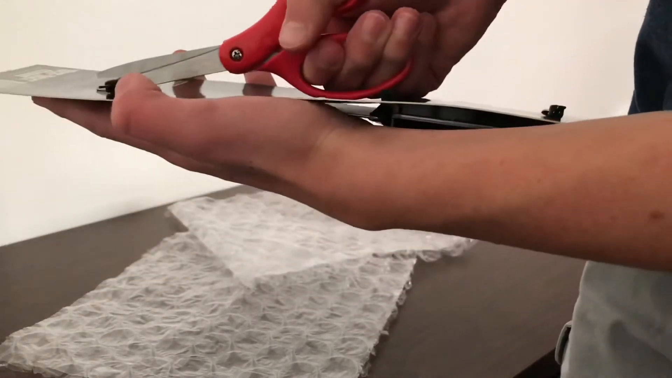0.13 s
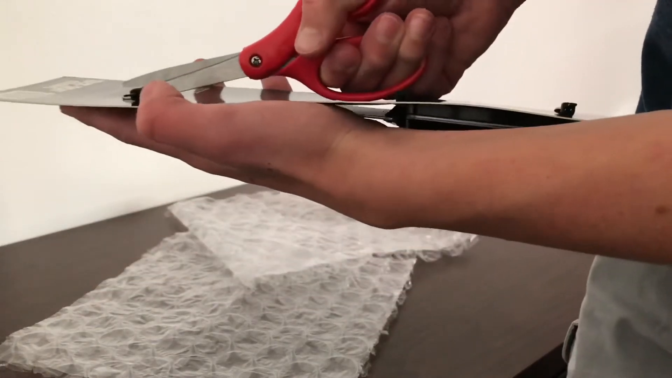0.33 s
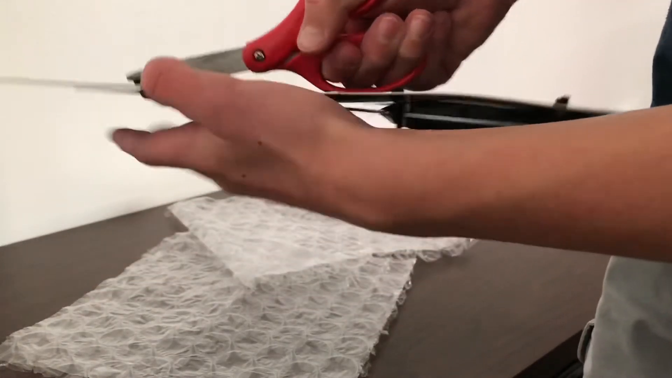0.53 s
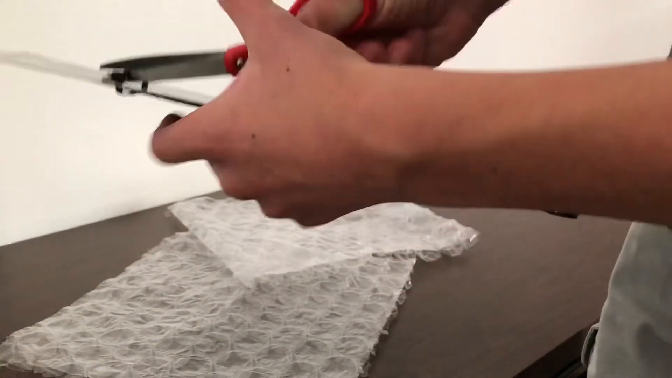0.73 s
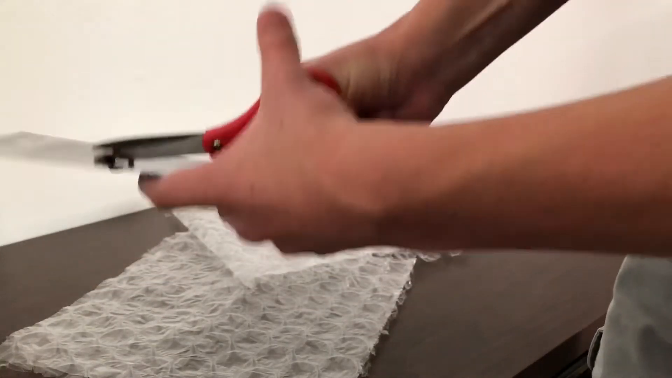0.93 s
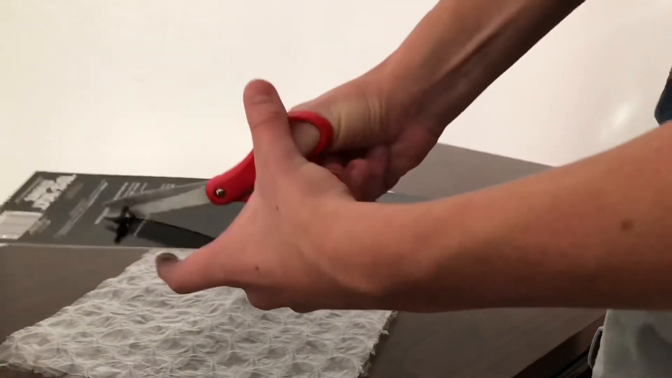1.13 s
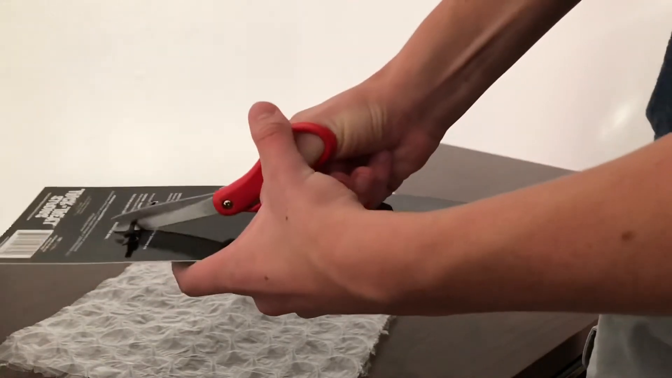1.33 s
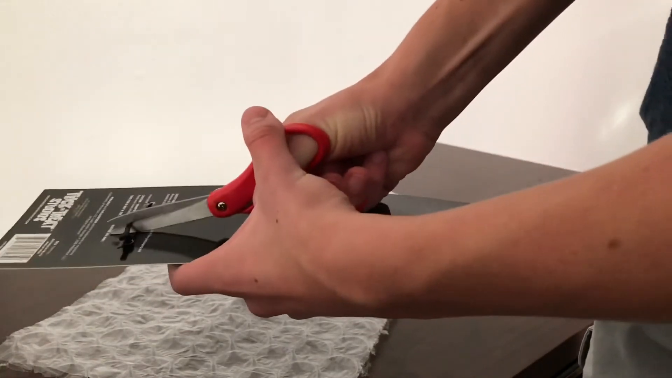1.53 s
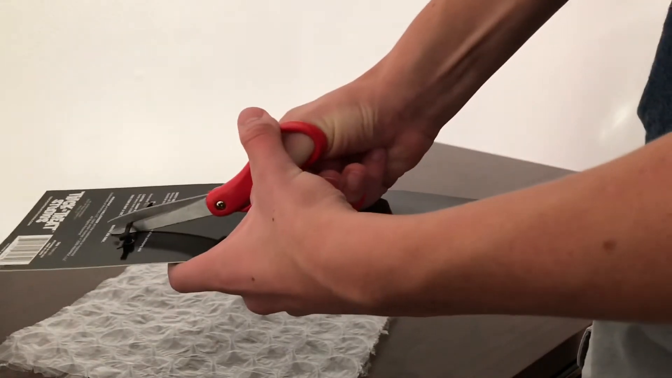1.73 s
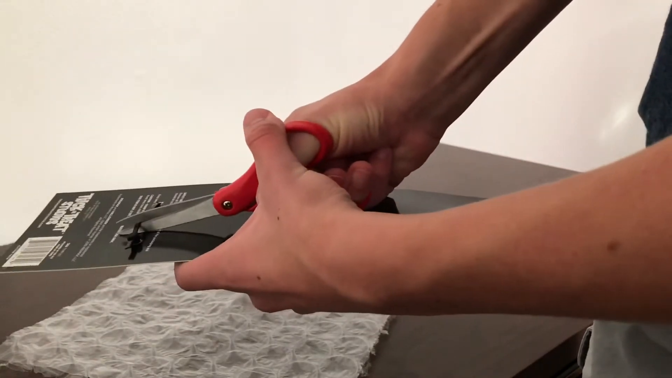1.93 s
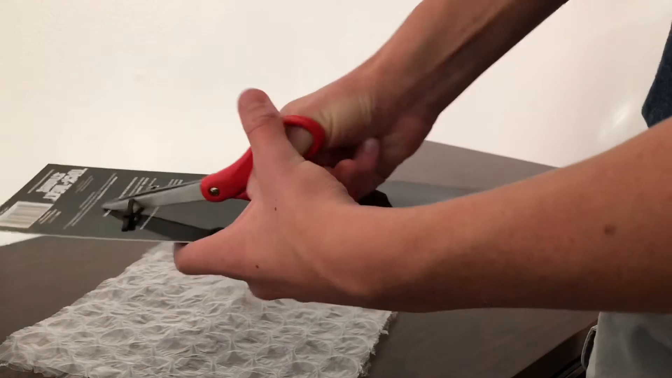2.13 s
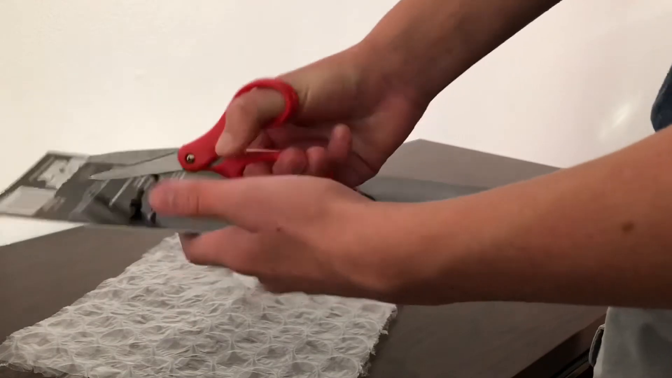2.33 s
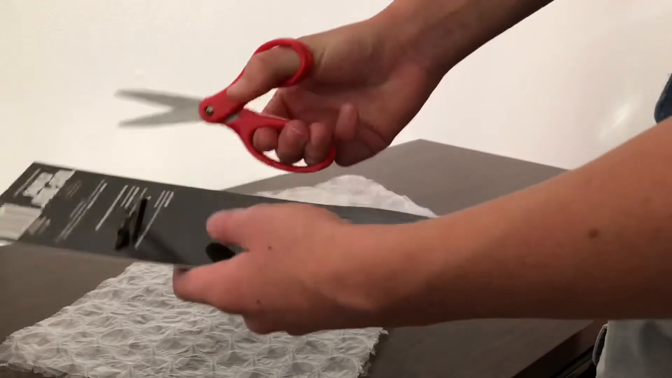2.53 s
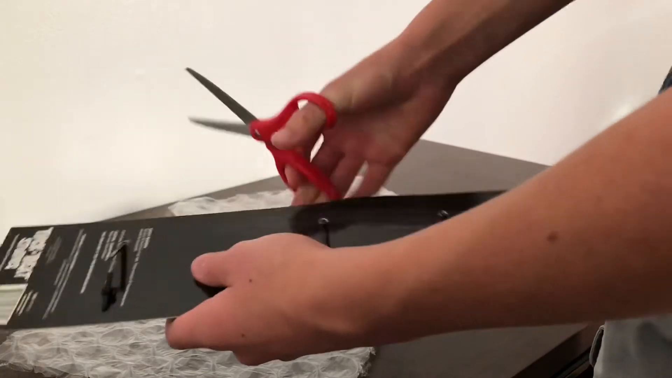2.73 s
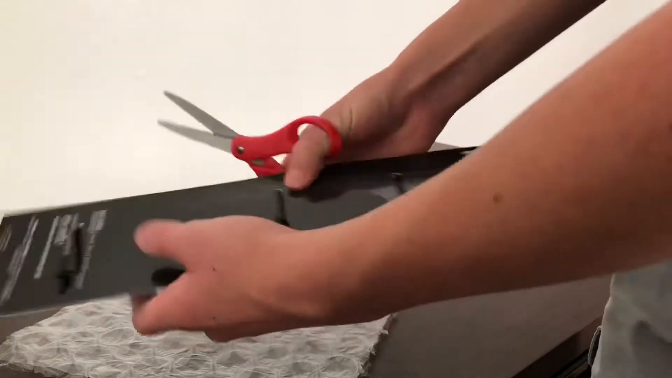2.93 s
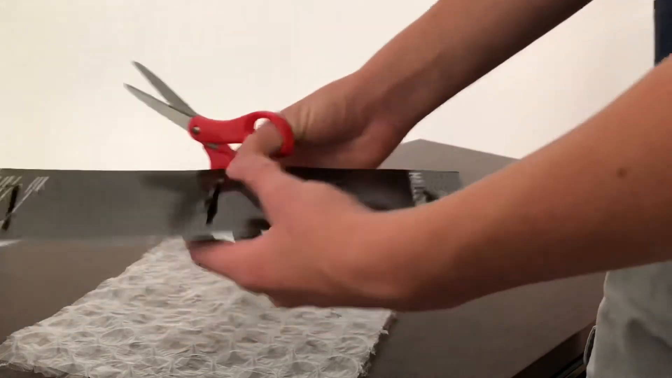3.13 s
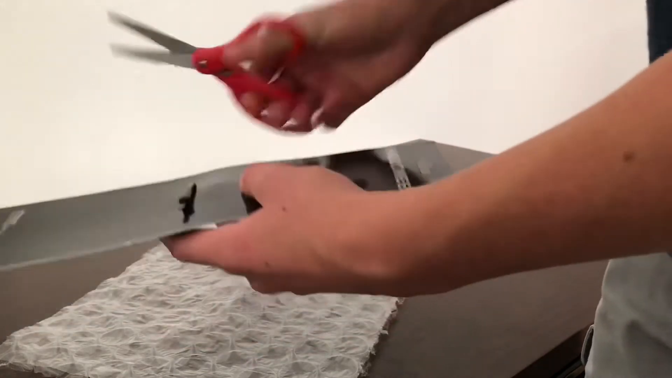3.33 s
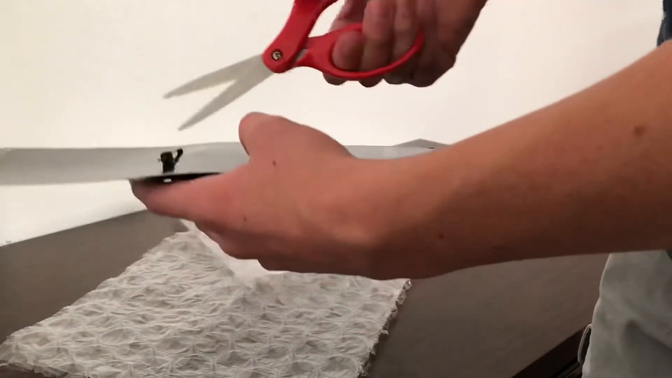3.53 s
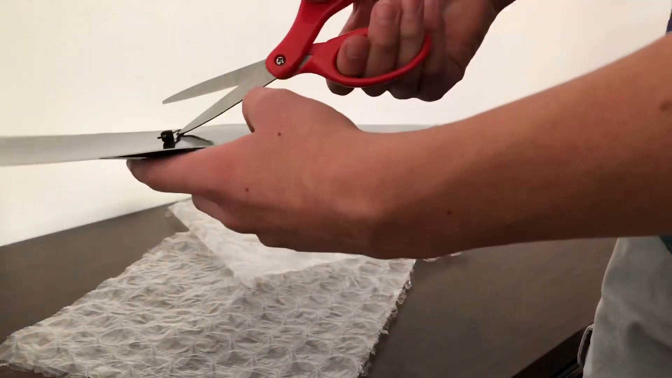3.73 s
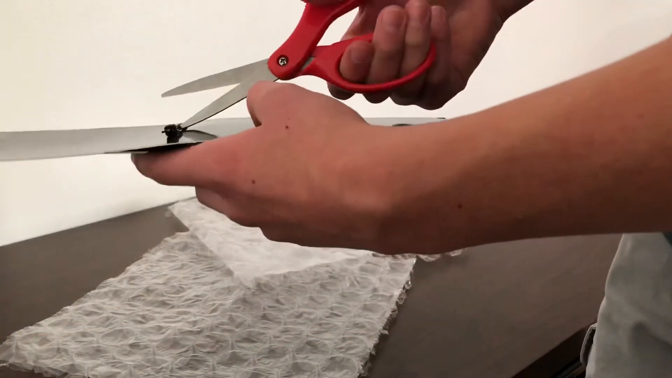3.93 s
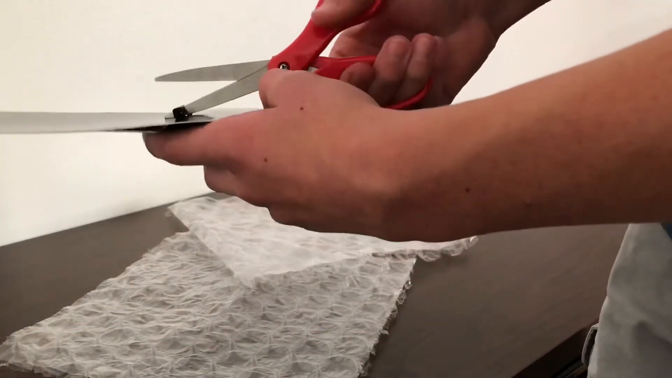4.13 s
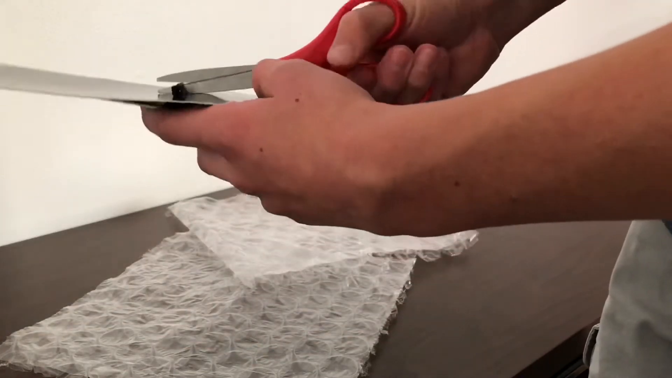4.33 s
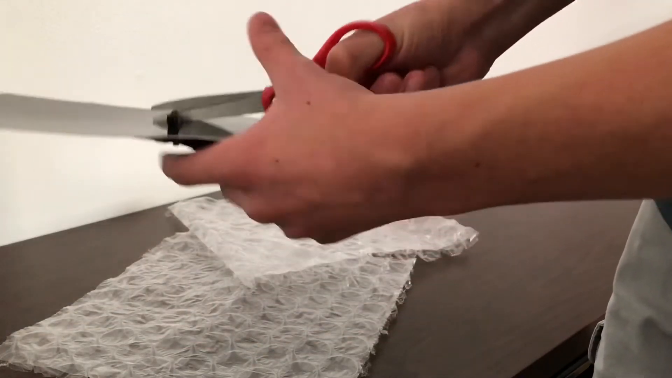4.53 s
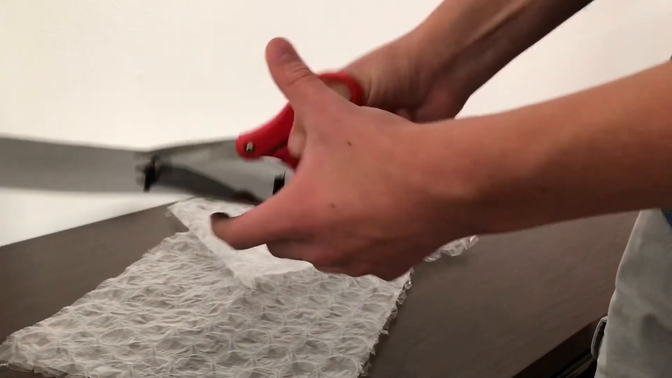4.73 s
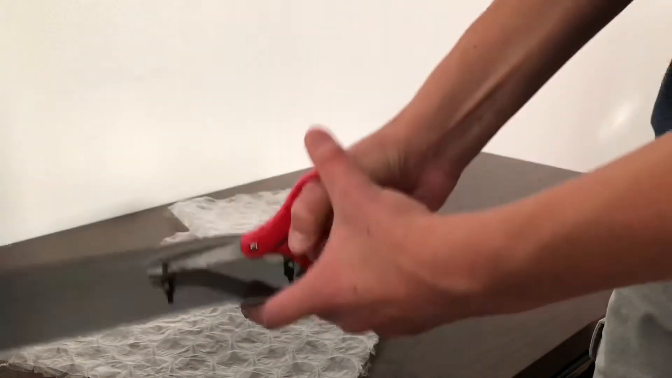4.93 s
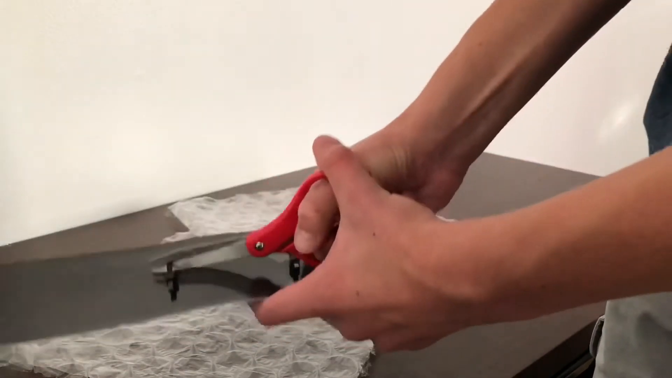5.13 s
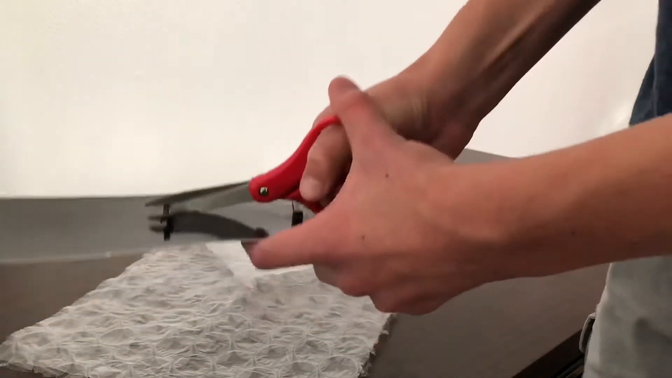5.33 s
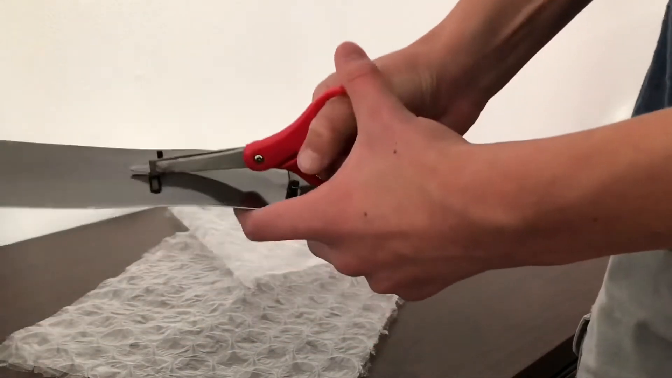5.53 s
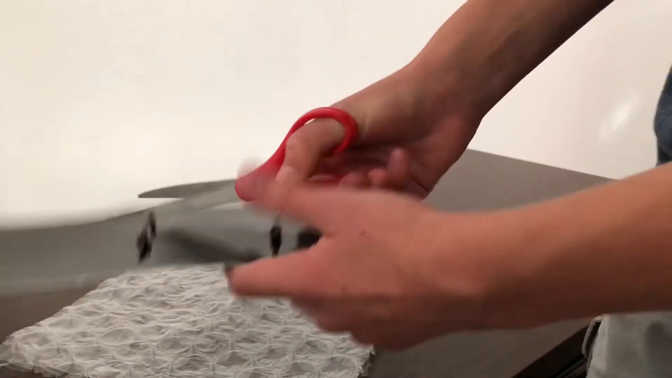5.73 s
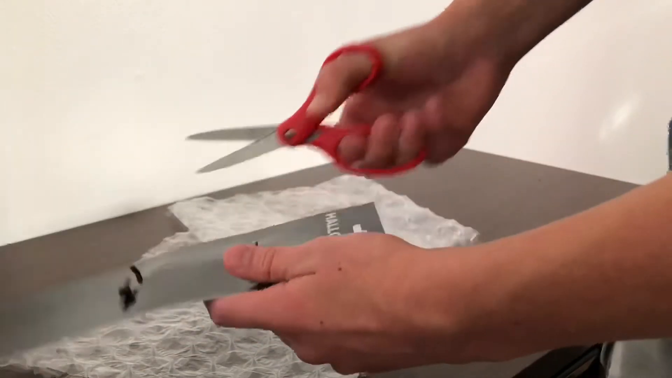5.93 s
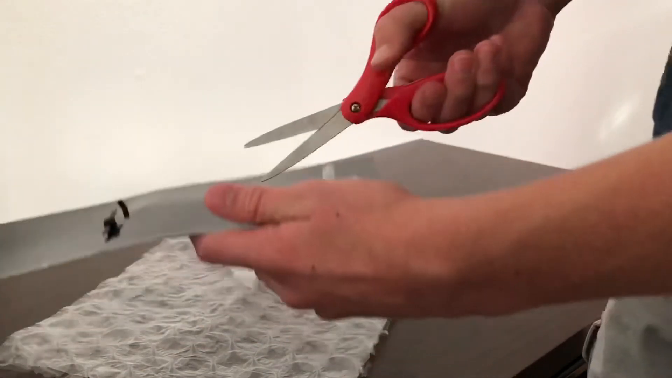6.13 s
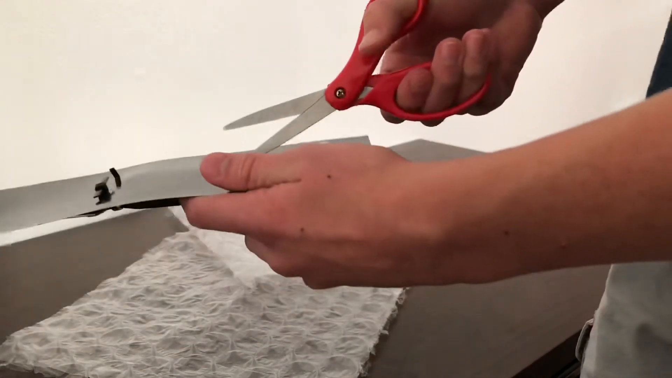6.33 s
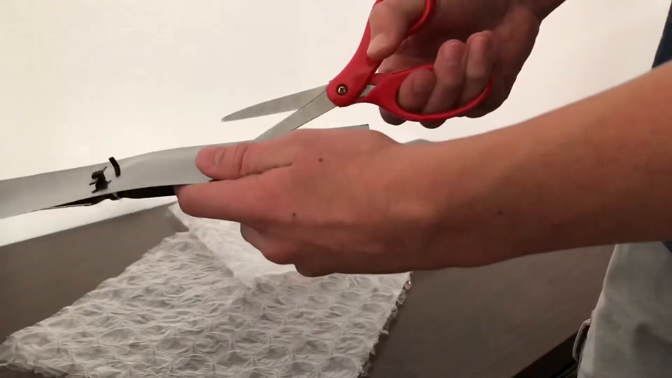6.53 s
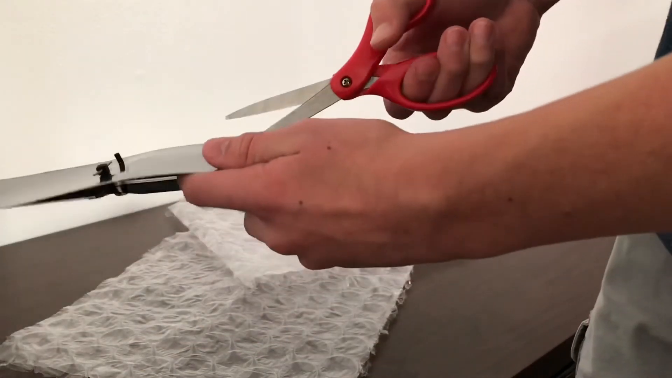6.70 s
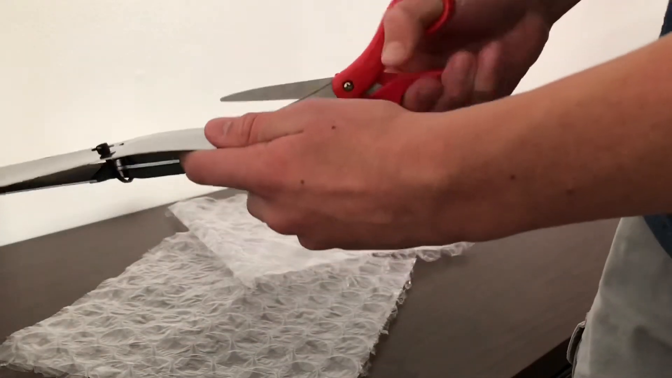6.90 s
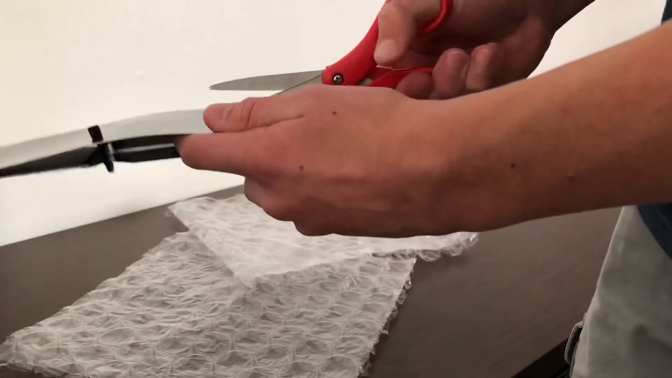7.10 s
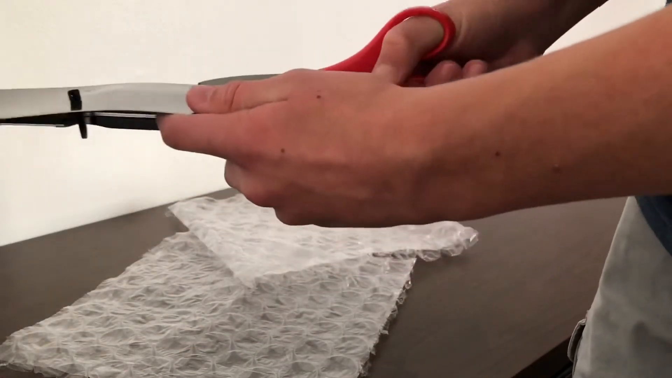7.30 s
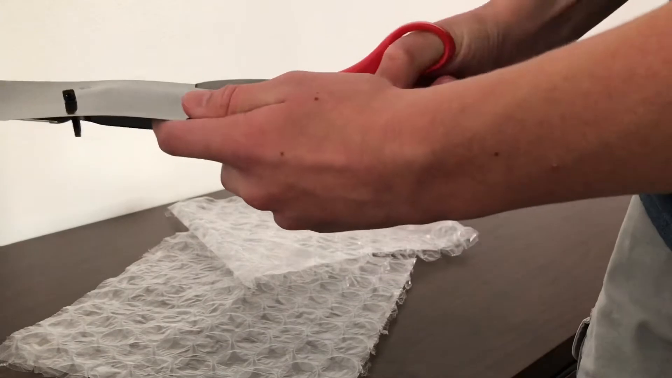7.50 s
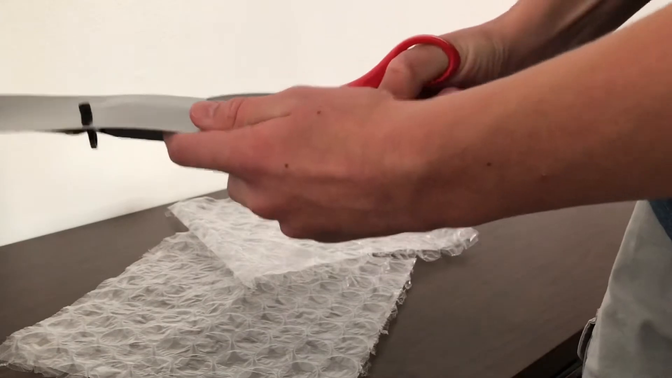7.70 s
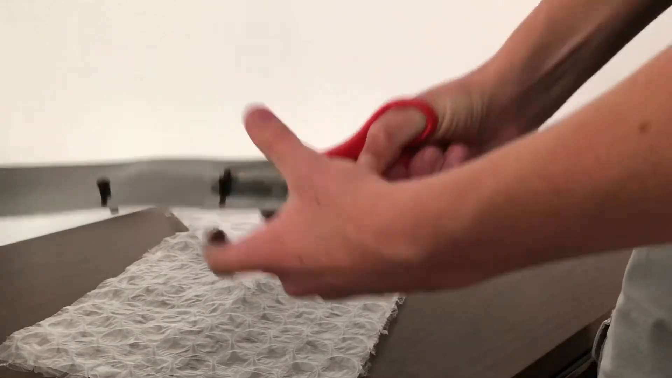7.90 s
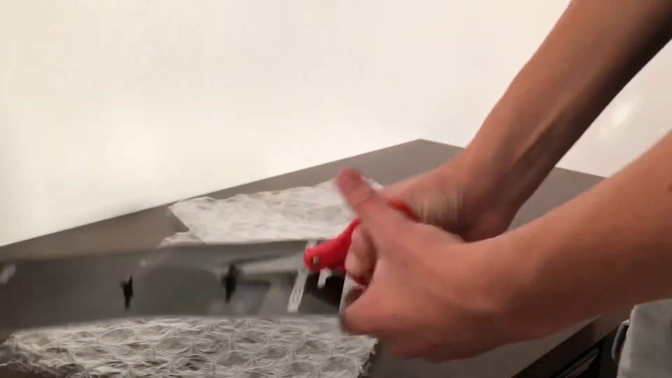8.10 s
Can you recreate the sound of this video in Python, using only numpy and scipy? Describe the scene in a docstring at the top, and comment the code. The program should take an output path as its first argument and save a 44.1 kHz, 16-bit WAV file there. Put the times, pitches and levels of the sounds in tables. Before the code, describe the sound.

Close, dry clicks and crackly handling of stiff packaging, broken by two hard cracks as scissors cut plastic ties.

```python
"""Scissors work at the plastic ties on a stiff card, close to a camera in a small quiet room.
From the start, filtered noise gives faint hiss and rumble, and fingers rub the card (rough, crackly noise).
Before half a second blades begin to scuff and tick; soft thumps, decaying sine waves, soon join in.
Ties snap near 1.9 s and 5.3 s: noise bursts, with a blow that rings the card and the room.
Small contacts go on between and after the snaps; at the end only rubbing and the faint background are left."""
import sys
import numpy as np
from scipy import signal
from scipy.fft import rfft, irfft, next_fast_len
from scipy.io import wavfile

SR = 44100
rng = np.random.default_rng(int(sys.argv[2]) if len(sys.argv) > 2 else 0)


def put_to_file(sound):
    """Save the sound as 16-bit audio at rate SR, in the file named by the first command-line argument."""
    columns = np.atleast_2d(sound).T  # one column per channel
    safe = np.clip(columns, -1, 1)
    whole_steps = np.round(safe * 32767)
    wavfile.write(sys.argv[1], SR, whole_steps.astype(np.int16))


N = 364266

# colour of the room and microphone noise, only its shape counts: (f/Hz, level/dB)
AIR_COLOUR = [(15, -36), (28, -17), (45, -6), (119, -8), (171, -15), (306, -15.5), (400, -20.5),
              (857, -23.5), (1920, -29.5), (15500, -36.5)]
AIR_DB = -64.5  # level of that noise before the final colouring
# fingers on the card: (t/s, rustle level/dB, hiss level/dB)
RUBS = [(.2, -78, -80), (.4, -69, -79), (.92, -59, -65), (1.25, -83.5, -90), (1.93, -85, -89.5),
        (2.03, -52.5, -57), (2.2, -54, -63), (2.55, -81, -94), (2.999, -64.5, -60.5), (3.45, -81.5, -83.5),
        (3.87, -72, -79.5), (4.5, -72, -77), (5.3, -73, -70), (5.599, -65.5, -71.5), (5.9, -75.5, -77),
        (6.6, -81, -86), (6.971, -67, -81.5), (7.5, -78.5, -89), (7.92, -75.5, -70), (8.26, -78, -81)]
# colour of skin rubbing: (f/Hz, level/dB)
SKIN_COLOUR = [(88, -71.5), (150, -9.5), (555, 4), (821, -1.5), (1140, 1), (1260, -7.5), (1600, -5.5),
               (2450, -7), (16000, -35)]

# short slides of blade or tie over the card:
# (t/s, length/s, level/dB over that length, favoured f/Hz, treble level/dB)
SCUFFS = [(0.398, 0.026, -59.5, 870, -9), (0.578, 0.032, -52, 766, -14.5), (0.877, 0.03, -46, 880, -25),
          (1.875, 0.029, -61.5, 3200, -6), (2.056, .045, -54, 1236, -20.5),
          (2.123, 0.027, -52.5, 1300, -3.5), (2.235, 0.029, -48, 2580, -1),
          (2.336, 0.029, -60, 2500, -21.5), (2.37, 0.017, -33.5, 1265, -24.5),
          (2.616, 0.092, -61.5, 5100, 3), (2.872, 0.04, -39, 1098, -15.5), (3.01, 0.042, -56.5, 1980, 0),
          (3.068, 0.025, -47, 646, -8), (3.185, 0.055, -58.5, 1910, -20.5),
          (3.725, 0.035, -59.5, 1780, -19), (3.872, 0.1, -62, 2515, -16), (3.967, 0.06, -57, 1757, -20),
          (4.201, 0.055, -53.5, 691, -25.5), (4.638, 0.094, -57.5, 848, -24),
          (4.876, 0.029, -39.5, 629, -9), (5.653, 0.031, -44, 1106, -7.5), (5.676, 0.02, -38.5, 2599, -3.5),
          (5.712, 0.044, -49, 1067, -15), (6.532, 0.035, -58, 2050, 0.5), (6.733, 0.096, -64, 1094, -12),
          (6.848, 0.047, -64.5, 1060, -9), (6.964, 0.0492, -56.5, 1110, -14), (7.059, .07, -66, 1140, -20),
          (7.112, 0.059, -59, 647, -11.5)]
# sharp contacts of blade, tie and card:
# (t/s, level/dB over the first 10 ms, favoured f/Hz, treble level/dB)
CLICKS = [(0.427, -48, 820, -7.5), (0.508, -50, 810, -8), (0.6825, -57.5, 810, -28),
          (0.776, -53.5, 4370, -12), (0.7846, -38.5, 990, -13.5), (0.8746, -39, 2900, -0.5),
          (0.9246, -51.5, 3200, -26), (0.9423, -51, 870, -33), (1.0203, -43.5, 1120, -12.5),
          (1.1223, -47, 650, -14), (1.3388, -64.5, 4360, -7), (1.9013, -17.5, 2350, 0),
          (1.902, -13.5, 666, -10), (1.9024, -22, 3800, -11), (2.073, -50, 2470, -34),
          (2.104, -54, 979, -31), (2.1205, -40.5, 1420, -33.5), (2.129, -45.5, 1520, -25),
          (2.2105, -48, 980, -22), (2.2491, -40, 910, -21), (2.3664, -32, 5900, -1),
          (2.3714, -25.5, 2820, 1), (2.3805, -34, 4370, -6.5), (2.385, -36.5, 1370, -19),
          (2.4116, -42, 1420, -8), (2.702, -53.5, 3570, 9), (2.815, -61, 1330, -8),
          (2.8287, -49.5, 490, -27), (2.848, -55, 2340, -9), (2.8623, -39, 1960, -3),
          (2.8831, -40, 1220, -3), (2.9549, -49, 1310, -17.5), (3.0989, -46.5, 2480, -21),
          (3.1047, -38, 2560, -9), (3.119, -47, 3200, -32), (3.183, -43, 1350, -12),
          (3.192, -49, 1640, -23), (3.2239, -62, 1102, -12.5), (3.2443, -53.5, 2714, -10),
          (3.6247, -46.5, 1810, -10), (4.2236, -55, 752, -4), (4.3156, -61, 1900, -37.5),
          (4.35, -65, 2006, -22.5), (4.4342, -62, 2393, -3.5), (4.7403, -45.5, 1060, -25),
          (4.799, -54.5, 800, -14), (4.8736, -34.5, 2630, -21), (5.317, -55.5, 3200, -8),
          (5.3385, -13.5, 3200, 2.5), (5.3398, -15, 1014, -12), (5.348, -27, 3080, -5.5),
          (5.579, -39.5, 885, -1.5), (5.599, -34, 1100, -5), (5.748, -49.5, 6170, 8.5),
          (5.7609, -45.5, 936, -13), (6.1142, -46.5, 1820, -16.5), (6.2153, -53, 2070, -16),
          (6.78, -62, 980, -19.5), (6.957, -44, 3120, -6.5), (6.962, -49.5, 1110, -3),
          (6.9645, -38.5, 2490, 5), (7.031, -58.5, 3000, -14), (7.043, -56.5, 675, -34),
          (7.054, -57, 1090, -30), (7.141, -55.5, 1990, -32), (7.1503, -48.5, 610, -41),
          (7.379, -67, 2380, -12), (7.7053, -56.5, 1174, -3), (7.7475, -57.5, 609, -5)]
# the card flexes or is knocked: (t/s, starting level/dB before the soft onset, f/Hz)
THUMPS = [(.59, -49, 100.5), (0.788, -42, 280), (.791, -32.5, 1230), (1.021, -38, 280), (1.902, -25, 126),
          (1.902, -21, 181), (1.902, -13.5, 275.1), (1.904, -15.5, 420), (1.905, -7, 840),
          (2.119, -35, 436), (2.371, -17, 1293), (2.829, -44, 112), (2.879, -45, 91), (3.099, -45, 98),
          (3.104, -32, 1256), (3.111, -39.5, 650), (3.626, -41.5, 280), (4.882, -43, 118),
          (5.339, -35.5, 128), (5.34, -19.5, 280), (5.343, -23, 417.3), (5.347, -22, 840), (5.58, -36, 280),
          (7.148, -43, 300)]

# ways the card rings: (f/Hz, width/Hz, level/dB before random scatter and the ring level)
CARD_MODES = [(280, 37, -2), (420, 19, 4), (697, 14, 1.5), (840, 36, 1), (1050, 96, -8), (1320, 160, -5.5),
              (1397, 20, -3), (1980, 12, -12.5), (2180, 150, -9), (2470, 66, -6), (3200, 180, -4),
              (3620, 180, -2.5), (5900, 220, -17.5)]
# colour of breaking plastic, shared by clicks and scuffs: (f/Hz, level/dB)
CRACK_COLOUR = [(40, -40.5), (100, -10.5), (200, -2), (500, -2.5), (1200, -3), (1700, -9.5), (2300, -8.5),
                (3300, -11.5), (4600, -10.5), (5700, -9.5), (8660, -12), (14600, -13), (16000, -16.5)]
# how long an echo of size 1 takes to fall 60 dB: (f/Hz, time/s)
ECHO_TIMES = [(100, 0.94), (300, 0.98), (1000, 0.59), (4000, 0.46), (12000, 0.24)]
# colour of the whole sound, uneven treble and then a steep fall near 16 kHz: (f/Hz, level/dB)
FINAL_COLOUR = [(4000, -2), (5000, -4.5), (6200, -2), (7700, -4), (8900, -1.5), (10500, -5.5), (12300, 1),
                (13200, -5), (14500, 2), (15800, 1), (16100, -19.5)]

# bass level at 1 kHz, -40 dB and treble -10 dB, then its change with each of these
BASS_DB, BASS_DB_PER_OCTAVE = -5, -5.5
BASS_DB_PER_DB, BASS_DB_PER_TREBLE_DB = -0.02, -0.12  # dull contacts are the fuller ones
SPOT_DB_PER_OCTAVE = -5  # spots pitched above 1 kHz ring less
BREAK_S, BREAK_GROWS = 0.0012, 0.16  # fading time at -45 dB; dB of time per dB of level
LEAD_S = 0.0004  # a break starts just before it is heard
THUMP_CYCLES, THUMP_S = 11, 0.025  # time to fall 60 dB: so many cycles plus this many seconds
THUMP_ROOM_DB = -11
ROOM_LOW_HZ = 230  # the small room hardly answers below
NEAR_SIZE = 0.087  # size of the nearby reflections; multiplies the echo times
SPAN = 2 ** 14  # samples in an echo; contacts last twice that
CEILING = 0.93  # where the camera's input saturates
TOP_HZ = 16800


def amp(db):
    """Turn decibels into a plain multiplier."""
    return 10 ** (np.asarray(db) / 20)


def unit(x):
    """Bring a sound to an average (RMS) strength of 1."""
    return x / np.sqrt(np.mean(x ** 2) + 1e-20)


def along(points, hz):
    """Read between (f/Hz, value) points, with pitch on a log scale."""
    f, value = np.transpose(points)
    return np.interp(np.log(hz + 1), np.log(f + 1), value)


def filtered(x, response):
    """Make each frequency of a sound stronger or weaker."""
    size = next_fast_len(len(x) + 8192)
    hz = np.fft.rfftfreq(size, 1 / SR)
    return irfft(rfft(x, size) * response(hz), size)[:len(x)]


def add(out, s, sound):
    """Mix a sound in at s seconds."""
    out[round(s * SR):][:len(sound)] += sound


def air():
    """Steady rumble of the house and hiss of the microphone: coloured noise."""
    noise = rng.standard_normal(N)
    return amp(AIR_DB) * unit(filtered(noise, lambda f: amp(along(AIR_COLOUR, f))))


def grit(count, spiky_db):
    """Friction: noise whose strength jumps as one tiny bump after another catches."""
    jumps = np.repeat(rng.standard_normal(count // 40 + 1), 40)[:count]  # one jump per 40 samples
    return unit(rng.standard_normal(count) * amp(spiky_db * jumps))


def crackle(rate, spread_db):
    """The bent card gives in small irregular pops, each a dying puff of a few ms."""
    when = rng.random(N) < rate / SR  # rate is the average number of pops per second
    size = amp(spread_db * rng.uniform(-1, 1, N))
    fade = np.exp(-np.arange(400) / SR / 0.0047)
    puffs = np.convolve(when * size, fade)[:N]
    return unit(puffs * rng.standard_normal(N))


def rubs():
    """Skin on coated card: friction makes a dull, crackly rustle and a fine hiss."""
    s, rustle_db, hiss_db = np.transpose(RUBS)
    t = np.arange(N) / SR
    rustle_level = amp(np.interp(t, s, rustle_db))
    hiss_level = amp(np.interp(t, s, hiss_db))

    def low_share(f):
        """Share of each frequency given to the rustle; the rest is hiss."""
        return 1 / (1 + (f / 4000) ** 4)

    rough = grit(N, spiky_db=-2.5) + amp(-1.5) * crackle(rate=64, spread_db=3.5)
    rustle = filtered(rough, lambda f: amp(along(SKIN_COLOUR, f)) * low_share(f))
    fine = grit(N, spiky_db=2.5)
    hiss = filtered(fine, lambda f: amp(along(SKIN_COLOUR, f)) * (1 - low_share(f)))
    return rustle_level * unit(rustle) + hiss_level * unit(hiss)


def causal(db):
    """Minimum-phase filter: the given levels, with the sound let out as early as possible."""
    cepstrum = irfft(np.maximum(db, -120) * np.log(10) / 20)
    half = len(cepstrum) // 2
    cepstrum[1:half] *= 2
    cepstrum[half + 1:] = 0
    return np.exp(rfft(cepstrum))


def room_tail(size, gap_s):
    """Spectrum of a fresh blurred echo: noise that swells over gap_s and dies at each pitch's own speed."""
    hz, t, cells = signal.stft(rng.standard_normal(SPAN), SR, nperseg=128)
    decay = amp(-60 * t / size / along(ECHO_TIMES, hz)[:, None])
    tail = signal.istft(cells * decay, SR, nperseg=128)[1][:SPAN]
    tail = tail * np.clip(np.arange(SPAN) / SR / gap_s, 0, 1)
    return rfft(tail / np.linalg.norm(tail), 2 * SPAN)


def resonance(f, centre_hz, width_hz):
    """Something that rings at one pitch; the narrower it is, the longer it rings."""
    return 1j * f * width_hz / (centre_hz ** 2 - f * f + 1j * f * width_hz)


def body_db(db, favour_hz, treble_db):
    """Bass of a contact: high-pitched spots and hard breaks have less body."""
    from_pitch = BASS_DB_PER_OCTAVE * np.log2(favour_hz / 1000)
    from_level = BASS_DB_PER_DB * (db + 40)
    from_treble = BASS_DB_PER_TREBLE_DB * (treble_db + 10)
    return BASS_DB + from_pitch + from_level + from_treble


def contact(force, feed, bass_db, treble_db, favour_hz, favour_db,
            spot_db, spot_q, ring_db, near_db, room_db):
    """The force is heard directly; the feed sets the card, the touched spot and the room sounding."""
    f = np.fft.rfftfreq(2 * SPAN, 1 / SR)
    tilt = along([(150, 1.5 * bass_db), (700, bass_db), (2800, 0), (10000, treble_db)], f)
    favour = favour_db * np.exp(-(np.log((f + 1) / favour_hz) / 0.24) ** 2)

    scatter = rng.normal(0, 3, len(CARD_MODES))  # each contact rings the card a little differently
    ringing = 0
    for k, (hz, width, db) in enumerate(CARD_MODES):
        ringing = ringing + (-1) ** k * amp(db + scatter[k]) * resonance(f, hz, width)

    bass_cut = (1j * f / (ROOM_LOW_HZ + 1j * f)) ** 3
    room = room_tail(0.58, gap_s=0.0033) * bass_cut
    spot_level = amp(spot_db + SPOT_DB_PER_OCTAVE * max(0, np.log2(favour_hz / 1000)))
    spot = spot_level * resonance(f, favour_hz, favour_hz / spot_q)
    near = room_tail(NEAR_SIZE, gap_s=0.0011)  # hands, table top and wall close by

    after = amp(ring_db) * ringing + amp(room_db) * room + spot + amp(near_db) * near
    colour = causal(along(CRACK_COLOUR, f) + tilt + favour)
    return irfft(colour * (rfft(force, 2 * SPAN) + rfft(feed, 2 * SPAN) * after))


def scuffs():
    """Each slide swells and fades as a gritty hiss through the card."""
    out, t = np.zeros(N + 2 * SPAN), np.arange(8192) / SR
    for s, length, db, favour_hz, treble_db in SCUFFS:
        swell = np.sin(np.pi * np.clip(t / length, 0, 1)) ** 0.79
        force = grit(len(t), spiky_db=5) * swell
        bass_db = body_db(db, favour_hz, treble_db)
        sound = contact(force, force, bass_db, treble_db, favour_hz, favour_db=2,
                        spot_db=9, spot_q=17, ring_db=1.5, near_db=-10.5, room_db=-7.0)
        add(out, s, amp(db) * sound / np.std(sound[:round(length * SR)]))
    return out[:N]


def clicks():
    """Each contact is a burst of fracture noise; harder breaks last longer."""
    out, t = np.zeros(N + 2 * SPAN), np.arange(2048) / SR
    for s, db, favour_hz, treble_db in CLICKS:
        u = t / (BREAK_S * amp(BREAK_GROWS * (db + 45)))
        shape = np.exp(-u) * (1 - np.exp(-u / 0.44))
        force = unit(grit(len(t), spiky_db=8.5) * shape)
        # card and room feel a single impulse with the energy of the whole burst
        blow = np.linalg.norm(force) * (shape == shape.max())
        bass_db = body_db(db, favour_hz, treble_db)
        sound = contact(force, blow, bass_db, treble_db, favour_hz, favour_db=4.5,
                        spot_db=10, spot_q=9, ring_db=7.5, near_db=-2.0, room_db=-6.5)
        add(out, s - LEAD_S, amp(db) * sound / np.std(sound[:SR // 100]))
    return out[:N]


def thumps():
    """A soft push or knock: a sine wave that soon dies away, and the room's answer."""
    out, t = np.zeros(N + SR), np.arange(SR // 4) / SR
    for s, db, hz in THUMPS:
        fade = amp(db - 60 * t / (THUMP_CYCLES / hz + THUMP_S))
        soft_onset = 1 - np.exp(-t / 0.0023)
        push = fade * np.sin(2 * np.pi * hz * t) * soft_onset
        answer = amp(THUMP_ROOM_DB) * room_tail(0.33, gap_s=0.0029)
        add(out, s, irfft(rfft(push, 2 * SPAN) * (1 + answer)))
    return out[:N]


def scene():
    """Everything near the card, over the background, as one channel."""
    return (air() + rubs() + scuffs() + clicks() + thumps())[None]


def record(dry):
    """The treble is made uneven and falls steeply near 16 kHz, the loudest peaks round off, the top is cut."""
    heard = filtered(dry[0], lambda f: amp(along(FINAL_COLOUR, f)))
    heard = heard / (1 + np.abs(heard / CEILING) ** 6) ** (1 / 6)
    return filtered(heard, lambda f: f < TOP_HZ)[None]


dry = scene()
out = record(dry)
put_to_file(out)
```